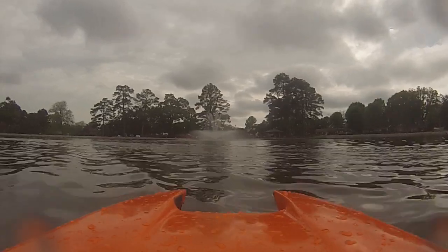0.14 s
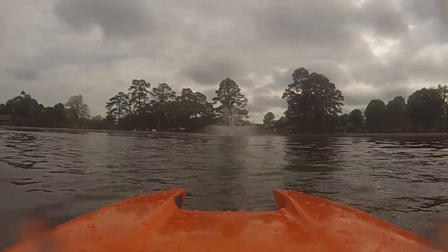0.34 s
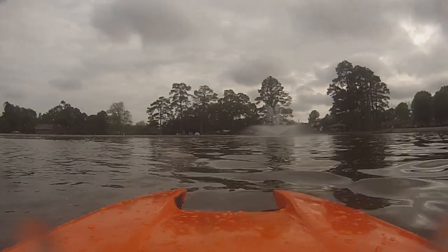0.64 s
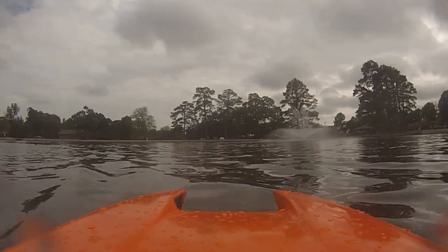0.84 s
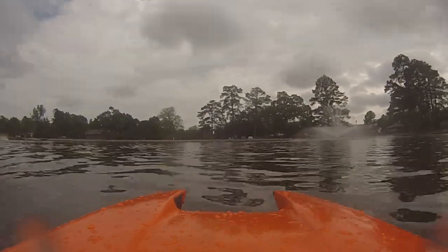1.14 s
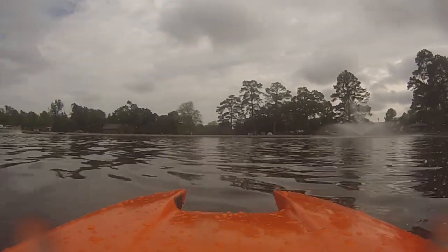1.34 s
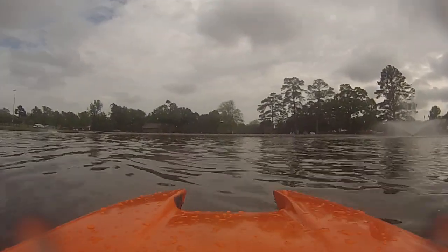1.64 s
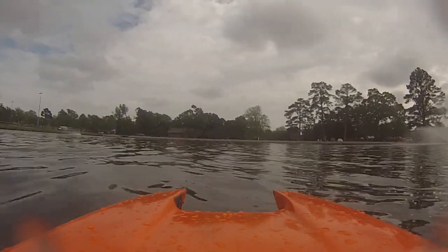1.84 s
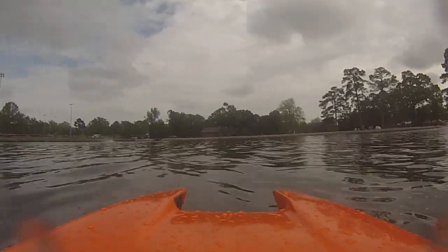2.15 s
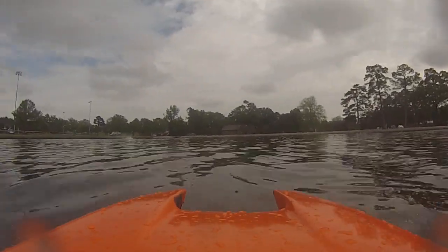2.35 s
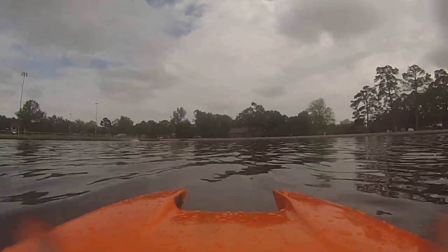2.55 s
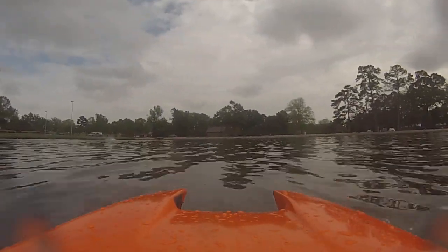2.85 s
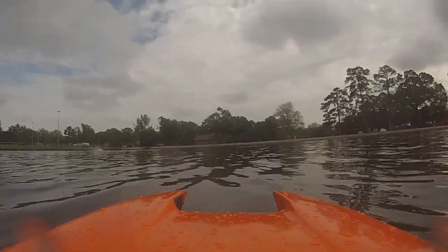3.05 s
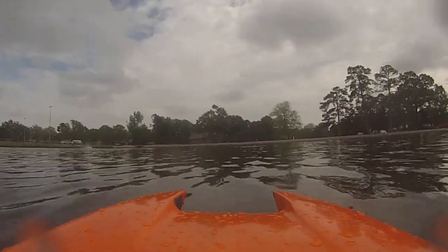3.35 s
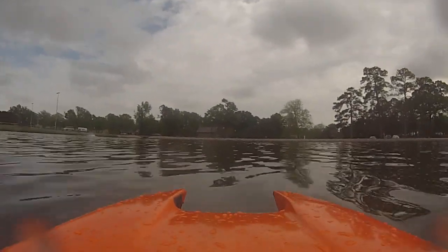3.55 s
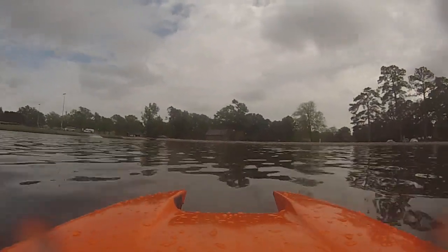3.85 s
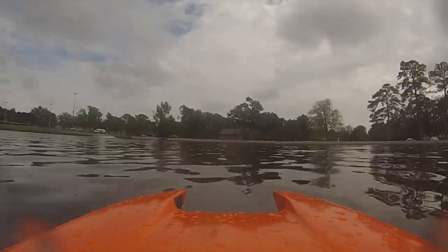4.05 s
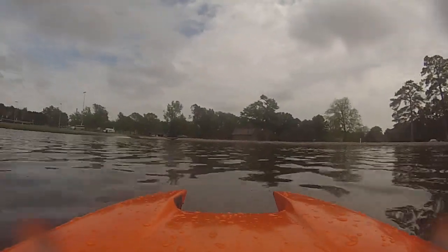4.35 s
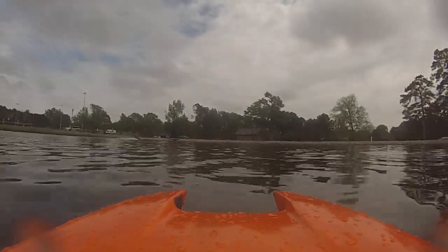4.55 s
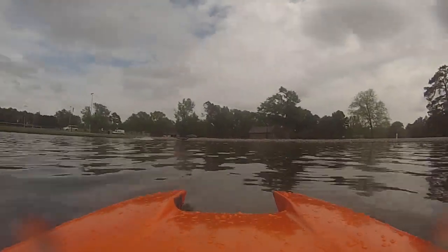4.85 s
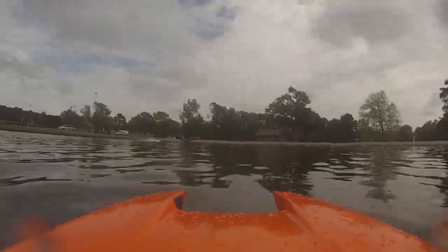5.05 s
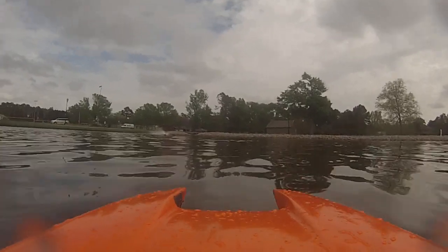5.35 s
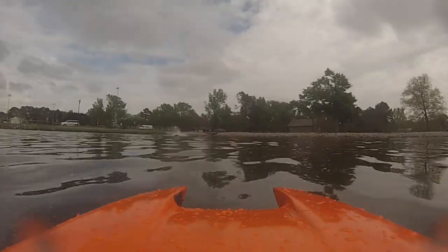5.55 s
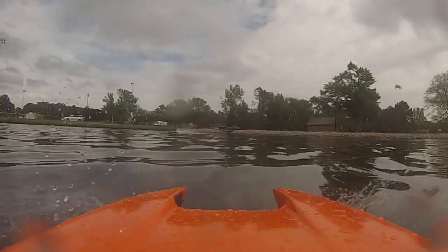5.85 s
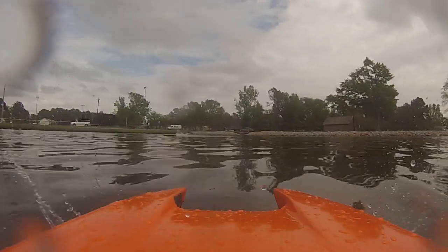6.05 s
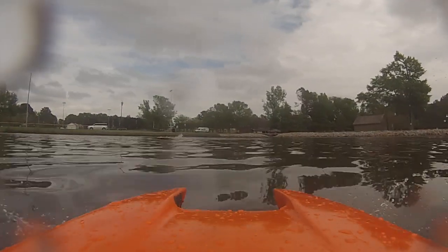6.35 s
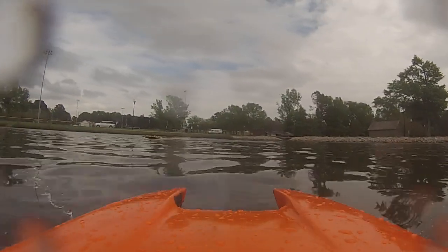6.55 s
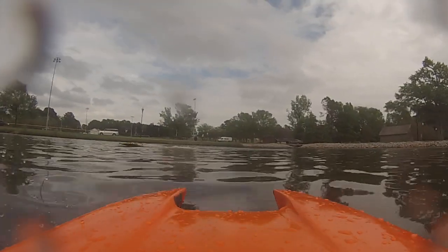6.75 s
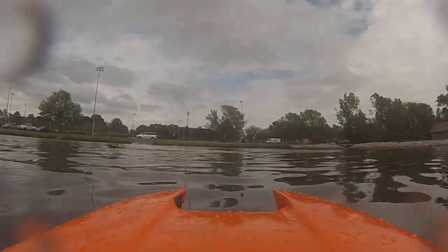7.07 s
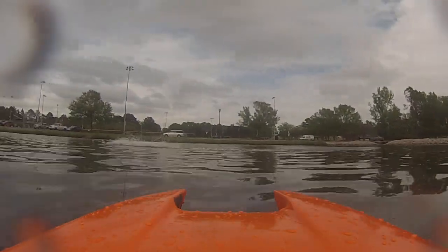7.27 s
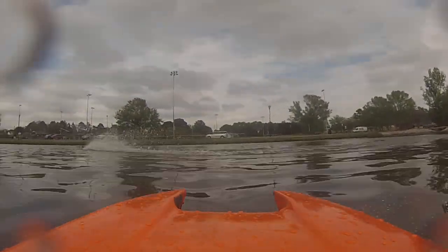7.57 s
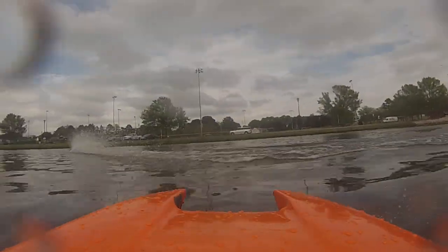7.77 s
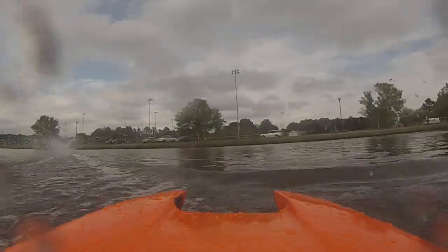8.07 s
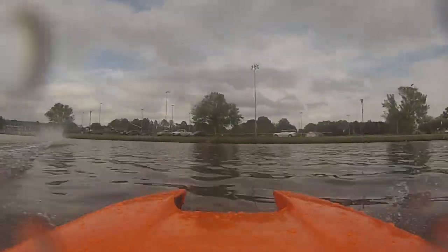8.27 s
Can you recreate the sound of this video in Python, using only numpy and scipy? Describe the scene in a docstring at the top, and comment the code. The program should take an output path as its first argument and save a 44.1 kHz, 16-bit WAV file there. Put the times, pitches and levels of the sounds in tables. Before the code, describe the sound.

A close, muffled, boxy deck microphone catches a small model boat running over open water. The electric drive buzzes and rattles with a coarse whine, first high, then lower, then high and steady. Spray hisses, ripples knock dully and drops tick. The motor dies away, leaving water slaps and heavy mount thumps, before it restarts, climbs and settles, with a late hard slap.

```python
"""A microphone in a sealed case rides on the deck of a small electric speedboat crossing a lake.
From the start shaft orders, rattle and hiss sound over water noise along the hull and a bouncing mount.
Ripples knock, noise bursts slap and damped sines ping as drops; the shaft slows early and later speeds up.
Then the throttle is cut: the last turns die away and the boat coasts through splashes and jolts of the mount.
At last it sets off again, the orders climbing with the shaft speed."""
import sys
import numpy as np
from scipy import signal
from scipy.fft import rfft, irfft
from scipy.io import wavfile
from scipy.ndimage import uniform_filter1d

SR = 44100
rng = np.random.default_rng(int(sys.argv[2]) if len(sys.argv) > 2 else 0)


def waveform_to_disk(signal):
    """Save audio, clipped to [-1, 1], as 16-bit WAV at the path in sys.argv[1]."""
    frames = np.transpose(np.atleast_2d(signal))
    scaled = np.clip(frames, -1, 1) * 32767
    samples = np.round(scaled).astype(np.int16)
    wavfile.write(sys.argv[1], SR, samples)


N = 370881


def from_db(db):
    """Level law: amplitude gain is ten to the power of dB over 20."""
    return 10 ** (np.asarray(db) / 20)


def rms_one(x):
    """Power normalisation: scale to a root mean square of 1."""
    return x / np.sqrt(np.mean(x ** 2) + 1e-20)


def in_time(rows):
    """Linear interpolation: each column after the seconds becomes a curve with one value per sample."""
    seconds, *columns = np.transpose(rows)
    return [np.interp(np.arange(N) / SR, seconds, column) for column in columns]


def drift(corner_hz):
    """Low-passed random process: noise through two equal one-pole filters, rms 1."""
    pole = np.exp(-32 * np.pi * min(corner_hz, 600) / SR)   # runs at a sixteenth of the sample rate
    noise = rng.standard_normal(N // 16 + 3002)
    slow = signal.lfilter([1], [1, -2 * pole, pole * pole], noise)[3000:]   # settled part only
    return np.interp(np.arange(N) / 16, np.arange(len(slow)), rms_one(slow))


def band(x, low_hz, high_hz):
    """Band-pass filtering: a Butterworth filter keeps the band between two corners."""
    return signal.sosfilt(signal.butter(2, [low_hz, high_hz], "band", fs=SR, output="sos"), x)


def low_pass(x, corner_hz):
    """Low-pass filtering: a second-order Butterworth filter softens the sound above its corner."""
    return signal.sosfilt(signal.butter(2, corner_hz, fs=SR, output="sos"), x)


def in_parts(x, flicker_db, corner_hz):
    """Independent modulation: bands up to the low treble flicker each on its own."""
    edges_hz = [60, 600, 900, 1700, 2900]
    parts = 0
    for low_hz, high_hz in zip(edges_hz, edges_hz[1:]):
        parts = parts + from_db(flicker_db * drift(corner_hz)) * band(x, low_hz, high_hz)
    return parts


def ring(clicks, hz, t60_s):
    """Damped resonance: a unit click starts a decaying sine of nominal height 1."""
    radius, angle = from_db(-60 / (t60_s * SR)), 2 * np.pi * hz / SR
    feedback = [1, -2 * radius * np.cos(angle), radius * radius]
    return signal.lfilter([0, np.sin(angle)], feedback, clicks + 1e-18)


def blend(powered, idle_level, idle):
    """Linear crossfade: from the powered to the idle level as the throttle shuts."""
    return powered + idle * (idle_level - powered)


# Broad colour of hull and case. Each row: frequency in Hz, relative gain in dB.
HULL_COLOUR = [(60, -26), (200, -29.5), (500, -6.5), (1100, -3.5), (2000, -16.5), (3000, -31.5),
               (5000, -34), (7000, -46.5), (11000, -61), (14000, -67.5)]
# Resonances and hollows of hull and case. Each row: centre in Hz, width in Hz, added gain in dB.
HULL_RESONANCES = [(263, 73, 15), (467, 126, -16.5), (773, 100, 2.5), (860, 62, -10.5), (996, 149, 9.5),
                   (1203, 150, 4.5), (1500, 130, 5), (1930, 56, -2), (2103, 490, 8), (2866, 1060, -13),
                   (3340, 520, 12), (4025, 630, 8.5), (4950, 70, 10), (5230, 540, -9), (5800, 200, 4),
                   (6020, 540, -11.5), (6540, 290, 4), (7100, 430, -6.5), (8440, 440, 8.5), (9250, 250, -4),
                   (10340, 1000, 8), (11200, 790, -3.5)]


def through_hull(x):
    """Minimum-phase transmission: folding the cepstrum makes the hull's colour a causal filter."""
    size = 8192
    hz = np.maximum(np.arange(size // 2 + 1) * SR / size, 1)
    colour_hz, colour_db = np.transpose(HULL_COLOUR)
    gain_db = np.interp(np.log(hz), np.log(colour_hz), colour_db)
    for centre_hz, width_hz, peak_db in HULL_RESONANCES:
        gain_db = gain_db + peak_db / (1 + (2 * (hz - centre_hz) / width_hz) ** 2)
    cepstrum = irfft(np.log(from_db(gain_db)))
    cepstrum[1:size // 2] *= 2
    cepstrum[size // 2 + 1:] = 0
    response = irfft(np.exp(rfft(cepstrum)))
    return signal.fftconvolve(x, response)[..., :N]


# Shaft speed until the throttle is cut. Each row: time in seconds, mean speed in turns per second.
SHAFT_SPEED = [(0.0, 368), (0.2, 371), (0.25, 344), (0.3, 284), (0.34, 244.5), (0.45, 224), (0.58, 230.5),
               (0.74, 225.5), (0.81, 246.5), (0.92, 252), (1.11, 249), (1.39, 260), (1.72, 258.5),
               (1.77, 251), (2.05, 250), (2.2, 246.5), (2.55, 248), (2.82, 244.5), (2.85, 249.5),
               (2.91, 309), (2.98, 362), (3.32, 366), (3.65, 371), (4.06, 376), (5.02, 379), (5.1, 375),
               (5.24, 322), (5.32, 283.5), (5.49, 242.5), (5.54, 209.5), (5.62, 182)]
# Shaft speed once the throttle opens again. Each row: time in seconds, mean speed in turns per second.
RESTART_SPEED = [(6.766, 86), (6.843, 133.7), (6.951, 212), (6.975, 228), (7.126, 254), (7.289, 287),
                 (7.42, 275.5), (7.53, 275), (7.65, 271.5), (7.99, 274), (8.345, 272), (8.41, 281)]
CUT_S, RESTART_S = SHAFT_SPEED[-1][0], RESTART_SPEED[0][0]
SWITCH_S = 0.012   # duration of the crossfade at the throttle
COAST_SAG_PER_S2 = 192   # turns per second lost each second
STOP_S, STOP_FADE_S = 6.2, 0.087   # the last turns die away
FULL_SPEED = 380   # turns per second


def coasting():
    """Throttle switching: seconds from the start, and how far the throttle is shut (0 to 1)."""
    t = np.arange(N) / SR
    return t, np.clip(np.minimum(t - CUT_S, RESTART_S - t) / SWITCH_S + .5, 0, 1)


def shaft():
    """Phase is the integral of rotation rate: mean speed, phase in radians, and presence of turning (0 to 1)."""
    t, idle = coasting()
    speed, = in_time(list(SHAFT_SPEED) + list(RESTART_SPEED))
    coast_speed = np.maximum(SHAFT_SPEED[-1][1] - COAST_SAG_PER_S2 * (t - CUT_S), 1)
    speed = np.where(idle > .5, coast_speed, speed)
    wavering = speed * (1 + 0.00198 * drift(7.96))   # the load on the propeller wavers
    turn = 2 * np.pi * np.cumsum(wavering) / SR
    turning = np.maximum(np.clip((STOP_S - t) / STOP_FADE_S, 0, 1), 1 - idle)
    return speed, turn, turning


# Relative levels under power. Each row: time in seconds, hum of the first two orders in dB,
# whine of the higher orders in dB, rattle in dB, hiss in dB.
POWER_LEVELS = [
    [(0.0, -6.5, 4, -16, -34), (0.2, 1, 3.5, -15.5, -35.5), (0.3, -11, -3.5, -14, -36),
     (0.35, 0.5, -1, -10, -34.5), (0.45, -2.5, -5.5, -18, -37), (0.75, 0.5, -7, -15, -33.5),
     (0.95, -1.5, -1.5, -11.5, -35.5), (1.75, -3, -2.5, -15, -36), (2.4, 1, -2.5, -12.5, -32),
     (2.85, -2.5, 1.5, -14.5, -32), (2.97, 1.5, -2, -14.5, -31.5), (3.25, 0, -3, -15, -35.5),
     (4.05, 1, 1.5, -16.5, -33), (4.8, 0, -0.5, -14.5, -35.5), (5.1, -0.5, -1.5, -15.5, -36),
     (5.3, -8.5, -5, -11.5, -33.5), (5.62, -3, -6.5, -16.5, -36.5)],
    [(6.766, -9, -16, -5.5, -41), (6.84, 7, -8.5, -4, -30.5), (6.97, -5, 6, -13.5, -30.5),
     (7.05, 0.5, 1, -11.5, -28.5), (7.3, 2, -0.5, -14.5, -34.5), (7.5, -2, -3, -14, -32.5),
     (7.85, -0.5, -3.5, -12, -33.5), (8.28, -7.5, -7, -10.5, -34), (8.36, -3, -3.5, -13.5, -33.5),
     (8.41, -3, -10, -7.5, -34.5)],
]
COAST_WHINE_DB, COAST_RATTLE_DB = -28, -26.5
COAST_HISS_DB, COAST_HISS_RISE_DB_PER_S = -50, 7


def motor_levels():
    """Source strength follows the throttle: relative dB curves of hum, whine, rattle and hiss."""
    t, idle = coasting()
    hum_db, whine_db, rattle_db, hiss_db = in_time(np.concatenate(POWER_LEVELS))
    whine_db = blend(whine_db, COAST_WHINE_DB, idle)
    rattle_db = blend(rattle_db, COAST_RATTLE_DB, idle)
    coast_hiss_db = COAST_HISS_DB + COAST_HISS_RISE_DB_PER_S * (t - CUT_S)
    return hum_db, whine_db, rattle_db, blend(hiss_db, coast_hiss_db, idle)


def phase_slip(speed):
    """Torsional phase jitter: the drive shudders while the speed changes."""
    change = np.abs(uniform_filter1d(np.gradient(np.log(speed)) * SR, size=4000))   # share per second
    return .008 + .1 * np.tanh(change / .8)


def order(multiple, level_db, turn, slip):
    """Random phase modulation: an order swells and slips on its own, high ones slipping most."""
    phase = multiple * turn + (0.25 + slip * multiple) * drift(30)
    return from_db(level_db + 2.4 * drift(15)) * np.sin(phase)


# Low orders of the shaft. Each row: multiple of the shaft speed, relative level at full speed in dB,
# loss per octave of speed in dB.
LOW_ORDERS = [(1, 3, 4.5), (2, 1, 18), (3, -1.5, 3), (4, -6, -4), (5, -4.5, -3.2), (6, 0, 0.5)]
# Response of the deck to a steady tone. Each row: frequency in Hz, relative gain in dB.
DECK_RESPONSE = [(90, -54), (180, -30), (230, -20), (290, -16), (375, -20.5), (470, -39), (560, -30.5),
                 (690, -24.5), (735, -24.5), (765, -18), (850, -29), (910, -27.5), (1000, -16),
                 (1100, -15.5), (1140, -20.5), (1250, -22.5), (1380, -25), (1470, -22.5), (1520, -29),
                 (1630, -29), (1840, -43.5), (1890, -33.5), (2190, -35), (2260, -32)]
COAST_BLADES_DB = -32.5


def low_orders(speed, turn, turning, slip, hum_db, whine_db):
    """Harmonic excitation: each turn shakes the deck at multiples of shaft speed, the first three clean."""
    _, idle = coasting()
    octaves_down = np.log2(FULL_SPEED / speed)
    deck_hz, deck_db = np.transpose(DECK_RESPONSE)
    levels = []
    for multiple, db, loss_db in LOW_ORDERS:
        answer_db = np.interp(np.log(multiple * speed), np.log(deck_hz), deck_db)
        levels.append(whine_db + db - loss_db * octaves_down + answer_db)
    levels[0] = levels[0] + (1 - idle) * (hum_db - whine_db)
    # two dragged blades beat twice a turn
    levels[1] = blend(levels[1] + hum_db - whine_db, COAST_BLADES_DB, idle)
    tones = 0
    for multiple, (level_db, waver_db) in enumerate(zip(levels, [1.9, 2.4, 2.8]), 1):
        # aligned phases: together one kick a turn
        tones = tones - from_db(level_db + waver_db * drift(27)) * np.cos(multiple * turn)
    for multiple, level_db in enumerate(levels[3:], 4):
        tones = tones + order(multiple, level_db, turn, slip)
    return turning * np.sqrt(2) * tones


# Orders above the sixth. Each row: multiple of the shaft speed, relative level in dB.
HIGH_ORDERS = [(7, -6.5), (8, -5.5), (9, 1), (10, 0.5), (11, 1.5), (12, -3), (13, -6)]
OVERTONES_DB, OVERTONES_DB_PER_OCTAVE = -18.5, 3.5   # relative level at full speed, loss as speed falls


def overtones(speed, turn, turning, slip, whine_db):
    """Narrow-band excitation: rough high orders of the shaft weaken as the speed falls."""
    steady_db = whine_db + OVERTONES_DB - OVERTONES_DB_PER_OCTAVE * np.log2(FULL_SPEED / speed)
    return turning * sum(order(multiple, steady_db + db, turn, slip) for multiple, db in HIGH_ORDERS)


def rattle(turning, rattle_db):
    """Broadband excitation: the flexing drive rattles as noise in flickering bands."""
    return turning * from_db(rattle_db + 13.5) * in_parts(rng.standard_normal(N), 1.3, 21)


def hiss(hiss_db):
    """Band-limited noise: two treble bands flicker independently."""
    noise = rng.standard_normal(N)
    middle = from_db(2.4 * drift(23)) * band(noise, 2600, 5530)
    upper = from_db(1.0 * drift(30)) * band(noise, 4240, 16000)
    return from_db(hiss_db + 34.5) * (middle + upper)


SWITCHING_HZ, SWITCHING_DB = 7774, -71


def switching_whistle():
    """Fixed-frequency switching: the speed controller whistles while the throttle is open."""
    t, idle = coasting()
    return (1 - idle) * from_db(SWITCHING_DB + 3.1 * drift(3)) * np.sin(2 * np.pi * SWITCHING_HZ * t)


def motor():
    """Rotational excitation: one shaft drives orders and noise; returns direct and hull-borne parts."""
    speed, turn, turning = shaft()
    hum_db, whine_db, rattle_db, hiss_db = motor_levels()
    slip = phase_slip(speed)
    direct = low_orders(speed, turn, turning, slip, hum_db, whine_db) + switching_whistle()
    once_a_turn = from_db(2.64 * turning * np.cos(turn + 0.13 * drift(40)))
    noise = once_a_turn * (rattle(turning, rattle_db) + hiss(hiss_db))
    return direct, overtones(speed, turn, turning, slip, whine_db) + noise


RUSH_DB, COAST_RUSH_DB, RUSH_SWELL_DB = -26.5, -28.5, 2   # relative levels, and spread of the slow swell


def spray(drops_per_s=400):
    """Flow noise and random impacts: water rushes along the hull, with drops ticking in clumps."""
    rush_db = blend(RUSH_DB, COAST_RUSH_DB, coasting()[1]) + RUSH_SWELL_DB * drift(1.2)
    sizes = from_db(3.0 * np.minimum(rng.exponential(1, N), 3)) * rng.choice([-1, 1], N)
    born = rng.random(N) < drops_per_s * from_db(4.0 * drift(30)) / SR
    rush = in_parts(rng.standard_normal(N), 2.0, 25)
    return from_db(rush_db + 15.5) * (rush + from_db(-7.0) * rms_one(sizes * born))


# Roughness of the water under the boat. Each row: time in seconds, mount bounce in dB.
ROUGHNESS = [(0.0, -39), (0.2, -25.5), (1.0, -28.5), (1.9, -31), (2.2, -25), (2.95, -29), (3.6, -31),
             (4.4, -29.5), (4.9, -26), (6.1, -28.5), (6.3, -38), (6.6, -18), (7.0, -41), (7.7, -36.5),
             (8.05, -19.5), (8.2, -29), (8.41, -21)]
# Jolts of the mount. Each row: time in seconds, strength in dB before softening.
MOUNT_JOLTS = [(6.507, -10), (6.530, -13), (6.587, -19), (6.63, -1), (6.649, -11), (6.742, -22)]
MOUNT_HZ, MOUNT_WIDTH_HZ = 38, 27.5
JOLT_HZ, JOLT_T60_S = 43, 0.18


def mount(bounce_db):
    """Mass-spring resonance: the mount bounces on the ripples and rings after hard jolts."""
    ripples = rng.standard_normal(N) * from_db(1.3 * drift(16))
    bounce = rms_one(band(ripples, MOUNT_HZ - MOUNT_WIDTH_HZ / 2, MOUNT_HZ + MOUNT_WIDTH_HZ / 2))
    rumble = from_db(-11.0) * rms_one(band(ripples, 72, 190))
    clicks = np.zeros(N)
    for start_s, strength_db in MOUNT_JOLTS:
        clicks[round(start_s * SR)] = from_db(strength_db)
    soft_blows = low_pass(ring(clicks, JOLT_HZ, JOLT_T60_S), 90)
    return from_db(bounce_db) * (bounce + rumble) + soft_blows


def ripple_knocks(bounce_db, knocks_per_s=14):
    """Impact resonance: small ripples knock dully under the hull, each at one of eight pitches."""
    sizes = from_db(4.5 * np.minimum(rng.exponential(1, N), 3))
    knocks = sizes * (rng.random(N) < knocks_per_s / SR)
    dealt, rings = rng.integers(0, 8, N), 0
    for k, hz in enumerate(np.geomspace(130, 700, num=8)):
        rings = rings + ring(knocks * (dealt == k), hz, 7.9 / hz)
    return from_db(0.34 * bounce_db - 21.0) * rings


LAKE_DB = -54   # mean level, before the flicker


def lake():
    """Distributed noise source: a faint wash of open water and air falls towards the treble."""
    wash = band(band(rng.standard_normal(N), 1500, 5400), 1000, 8000)
    return from_db(LAKE_DB + 2.7 * drift(20)) * rms_one(wash)


# Slaps of water on the hull. Each row: start in seconds, relative splash level in dB,
# relative thud level in dB.
WATER_SLAPS = [(0.222, -6, -20), (0.53, -4, -26), (0.978, -5, -17), (1.119, -7.5, -40), (1.434, -16, -20),
               (2.026, -10, -19), (2.139, -40, -29), (4.657, -11, -14), (4.948, -13, -17),
               (4.999, -22, -18), (5.051, -18, -33), (5.615, -15, -19.5), (5.699, -21, -43),
               (5.839, -21, -51), (6.148, -19, -22), (6.225, -19, -26), (6.337, -13.5, -29),
               (6.48, -21, -31), (6.548, -14, -32), (6.562, -13.5, -29), (6.619, -5.5, -20),
               (6.678, -15, -38), (6.70, -12, -40), (6.721, -9.5, -15.5), (8.002, -3.5, -16)]
SLAP_ATTACK_S, SLAP_DECAY_S = 0.00048, 0.012   # time constants


def slaps(ring_hz=1050):
    """Transient impact: each slap is a splash into the hull, a short ring of the deck and a dull thud."""
    splash, direct = np.zeros(N), np.zeros(N)
    t = np.arange(round(.1 * SR)) / SR
    shape = (1 - np.exp(-t / SLAP_ATTACK_S)) * np.exp(-t / SLAP_DECAY_S)
    noise = rng.standard_normal((len(WATER_SLAPS), 2, len(t)))
    for (start_s, splash_db, thud_db), (fizz, dull) in zip(WATER_SLAPS, noise):
        at = slice(round(start_s * SR), round(start_s * SR) + len(t))
        spatter = from_db(10.5) * band(fizz, 1800, 4500)
        deck_ring = rms_one(band(fizz, 0.69 * ring_hz, 1.3 * ring_hz))
        thud = rms_one(band(dull, 90, 450))
        splash[at] += from_db(splash_db + 1.0) * shape * (fizz + spatter)
        direct[at] += from_db(splash_db - 14.0) * shape * deck_ring
        direct[at] += from_db(thud_db) * shape * thud
    return splash, direct


# Single drops on the case. Each row: start in seconds, level in dB before softening, pitch in Hz.
CASE_DROPS = [(0.5282, -15.5, 2350), (2.137, -15.5, 2090), (5.7024, -23, 2220), (6.284, -17.5, 1140)]
DROP_T60_S = 0.065


def drops():
    """Impulse response: each drop strikes once and pings as a damped sine."""
    pings = 0
    for start_s, level_db, hz in CASE_DROPS:
        click = from_db(level_db) * (np.arange(N) == round(start_s * SR))
        pings = pings + ring(click, hz, DROP_T60_S)
    return low_pass(pings, 3500)


def scene():
    """Superposition: hull-borne sounds are filtered, then added to the direct ones."""
    bounce_db, = in_time(ROUGHNESS)
    direct_motor, shaking = motor()
    splash, slap = slaps()
    water = slap + drops() + ripple_knocks(bounce_db) + mount(bounce_db) + lake()
    hull_borne = through_hull(shaking + spray() + splash)
    return (direct_motor + hull_borne + water)[None]


CUTOFF_HZ = 14800   # stopband edge


def record(dry):
    """Saturation and band limiting: peaks are rounded, the top is cut."""
    rounded = 1.035 * np.tanh(dry)
    return signal.sosfilt(signal.cheby2(12, 70, CUTOFF_HZ, fs=SR, output="sos"), rounded)


dry = scene()
out = record(dry)
waveform_to_disk(out)
```